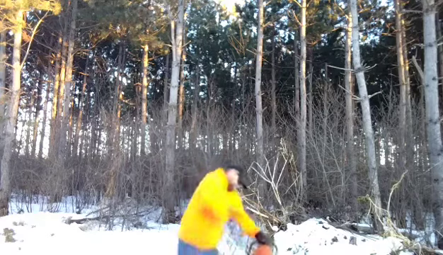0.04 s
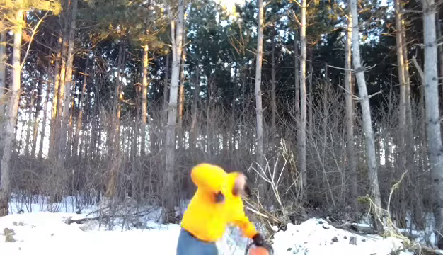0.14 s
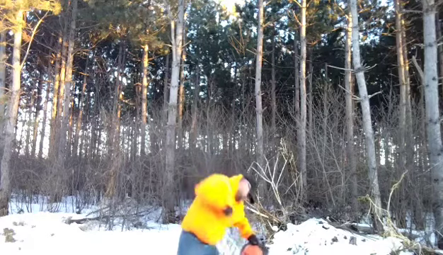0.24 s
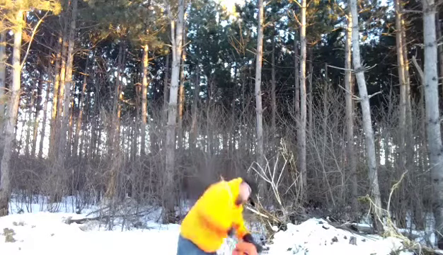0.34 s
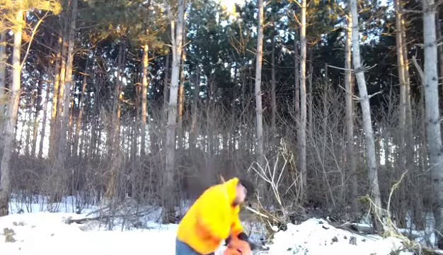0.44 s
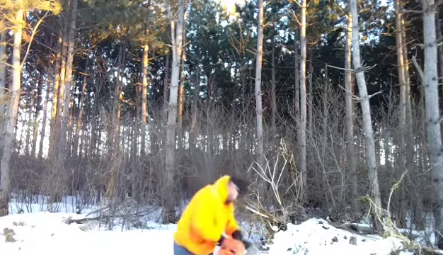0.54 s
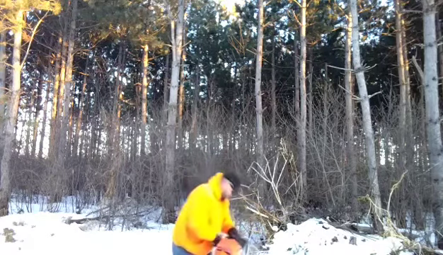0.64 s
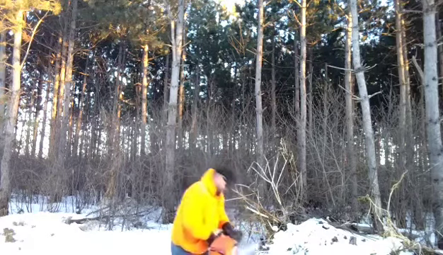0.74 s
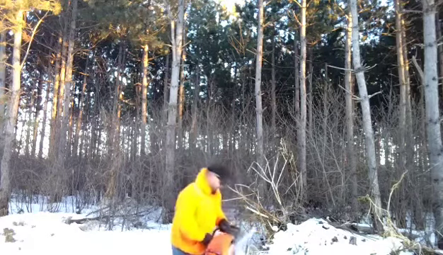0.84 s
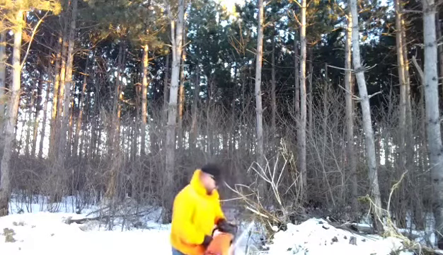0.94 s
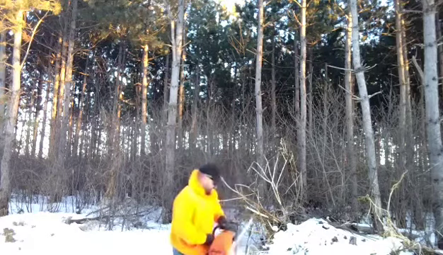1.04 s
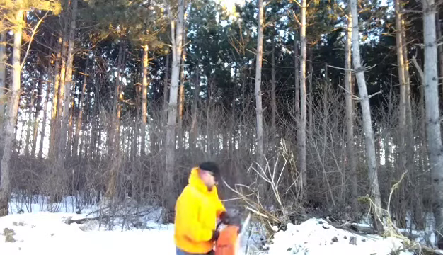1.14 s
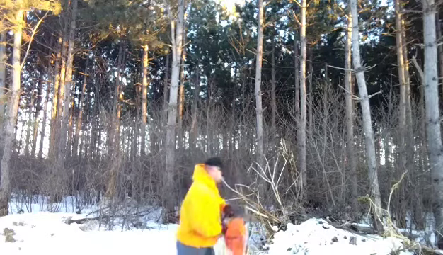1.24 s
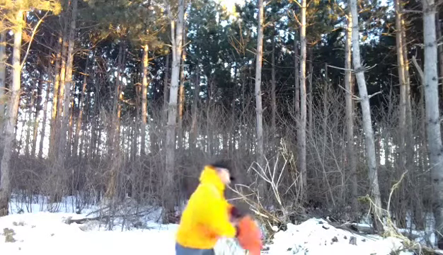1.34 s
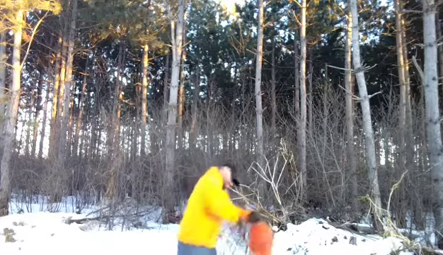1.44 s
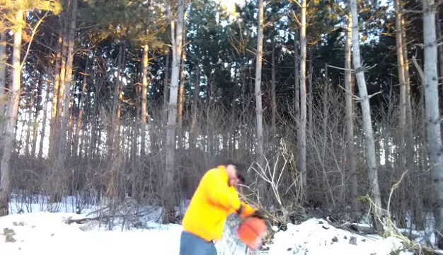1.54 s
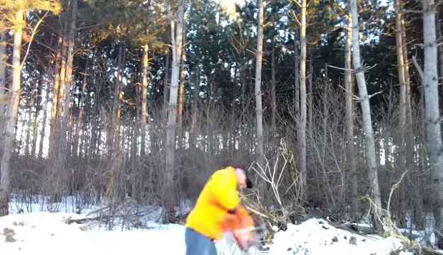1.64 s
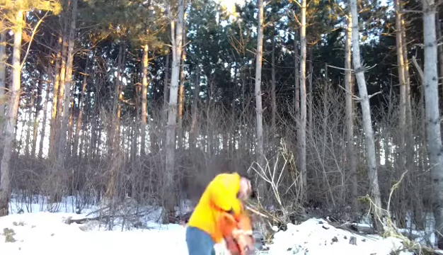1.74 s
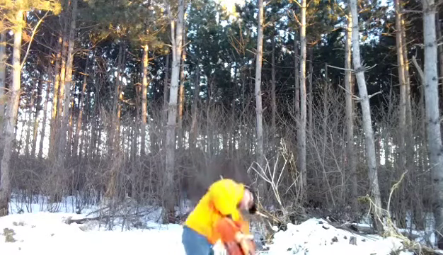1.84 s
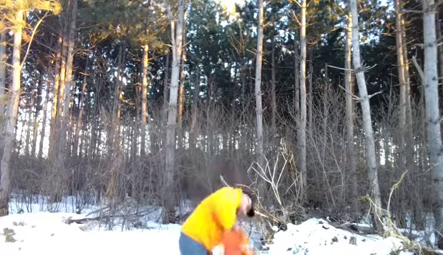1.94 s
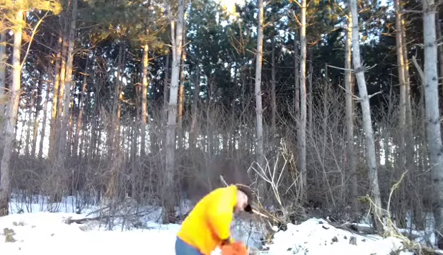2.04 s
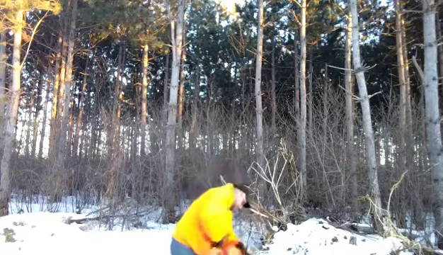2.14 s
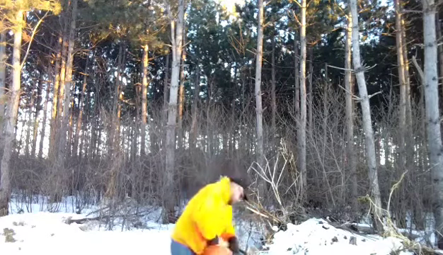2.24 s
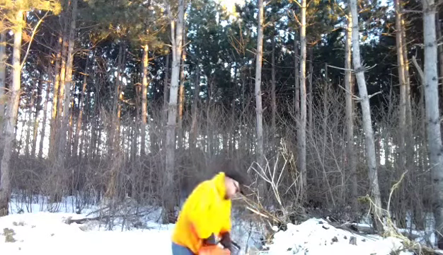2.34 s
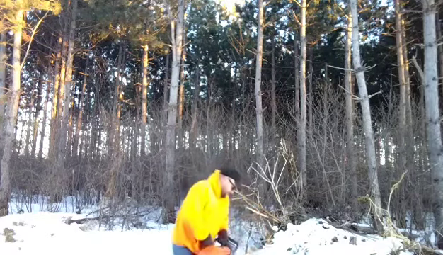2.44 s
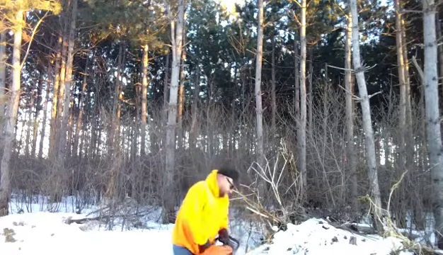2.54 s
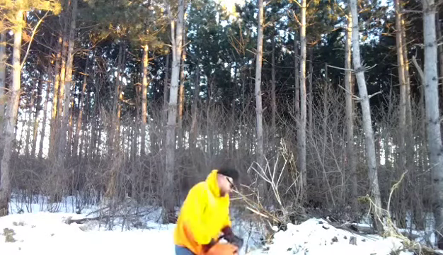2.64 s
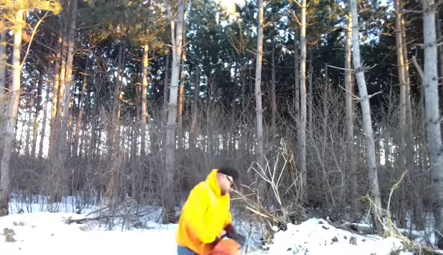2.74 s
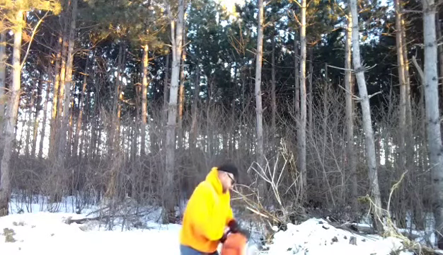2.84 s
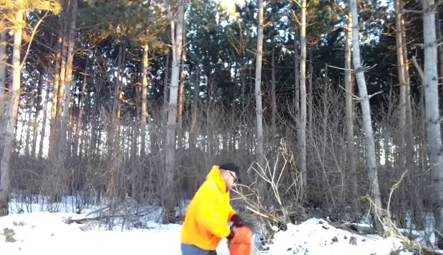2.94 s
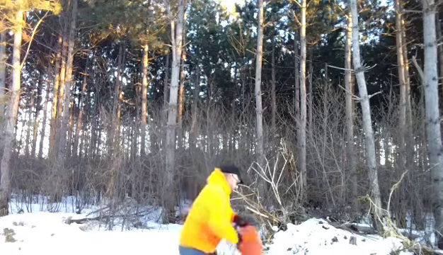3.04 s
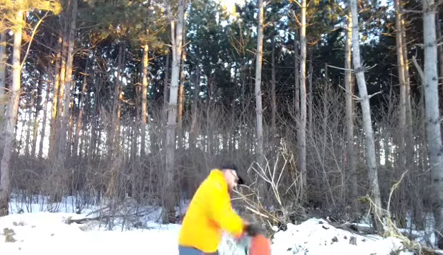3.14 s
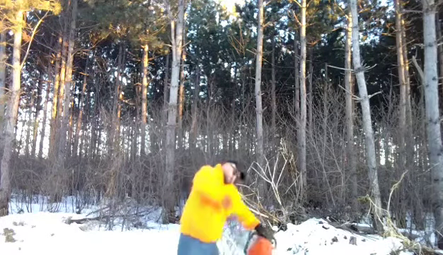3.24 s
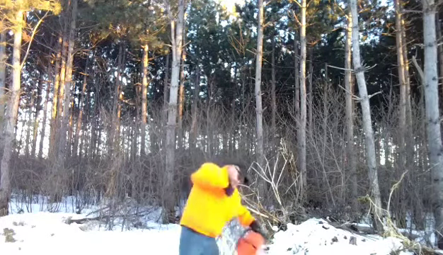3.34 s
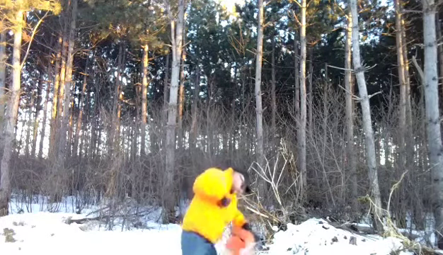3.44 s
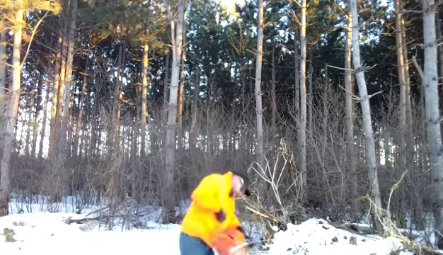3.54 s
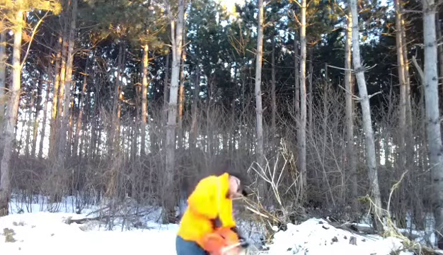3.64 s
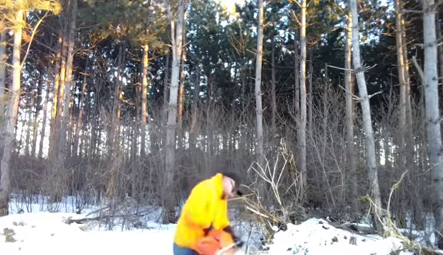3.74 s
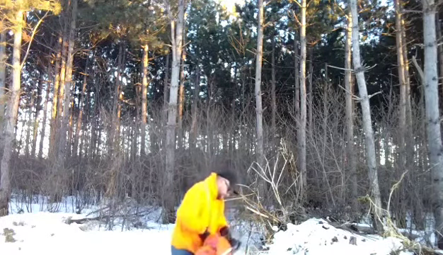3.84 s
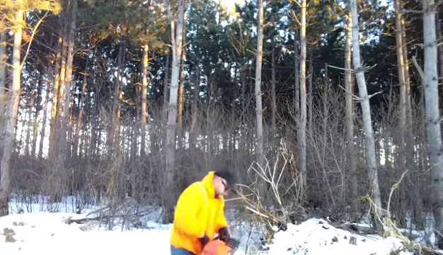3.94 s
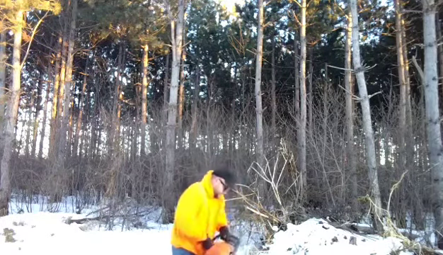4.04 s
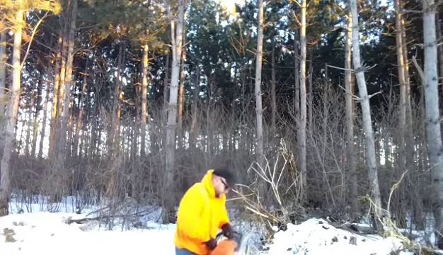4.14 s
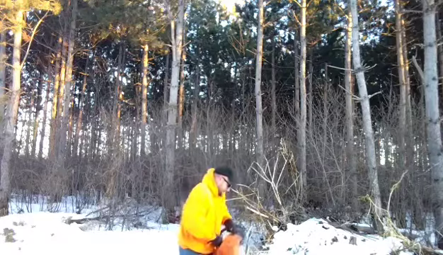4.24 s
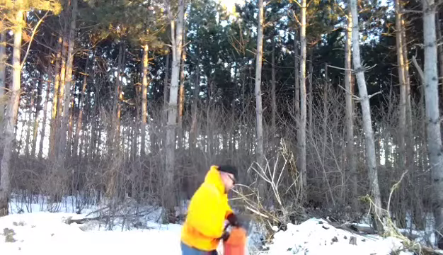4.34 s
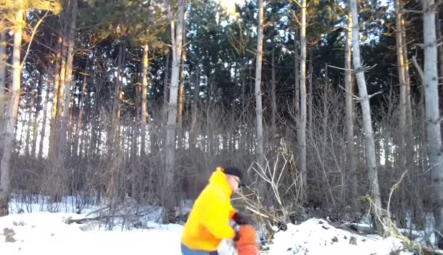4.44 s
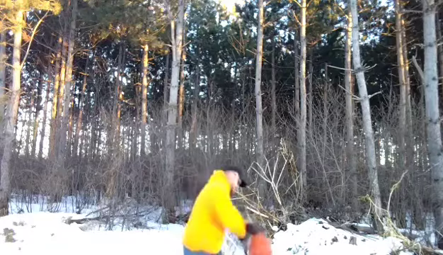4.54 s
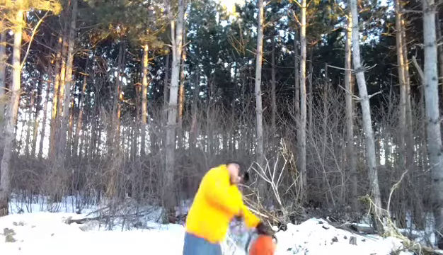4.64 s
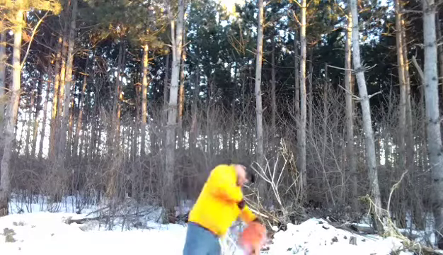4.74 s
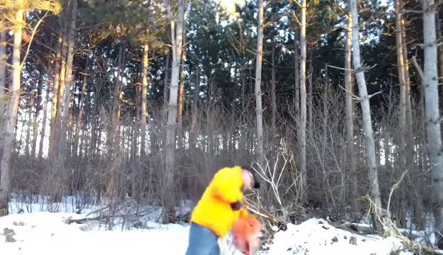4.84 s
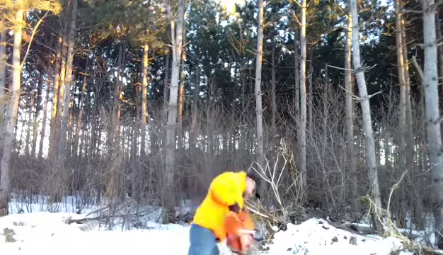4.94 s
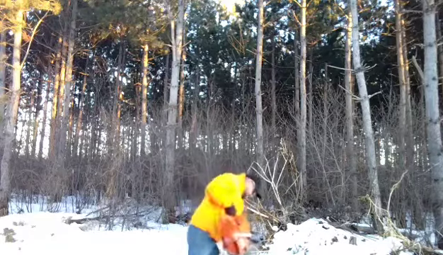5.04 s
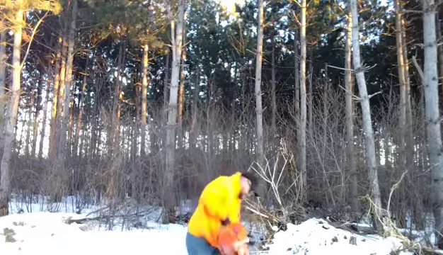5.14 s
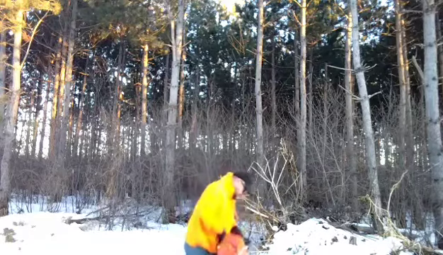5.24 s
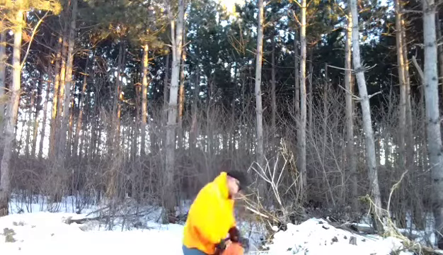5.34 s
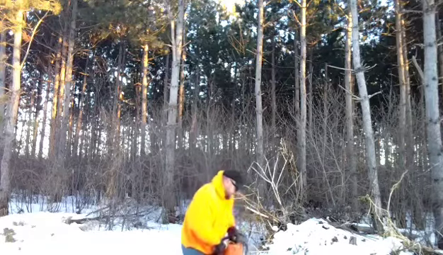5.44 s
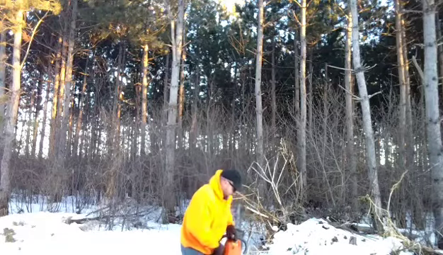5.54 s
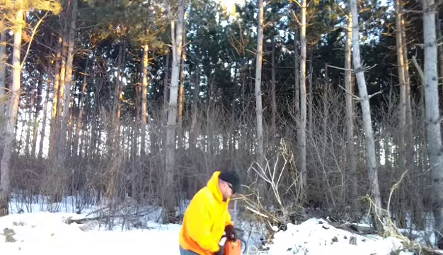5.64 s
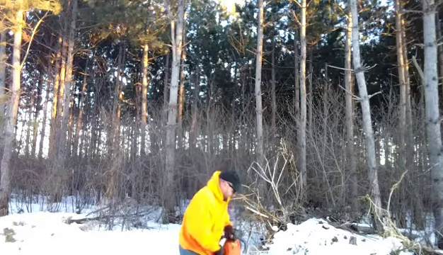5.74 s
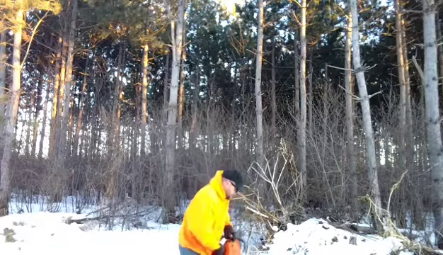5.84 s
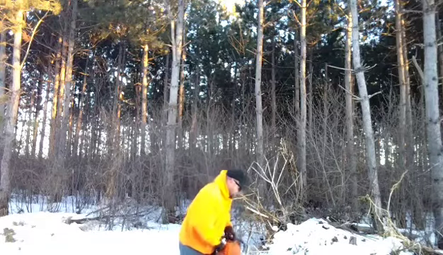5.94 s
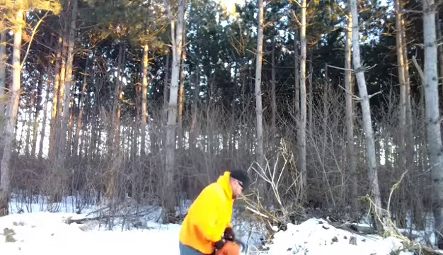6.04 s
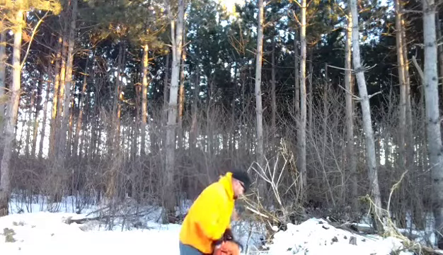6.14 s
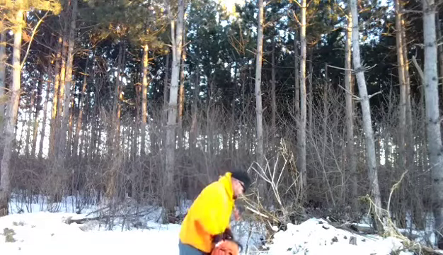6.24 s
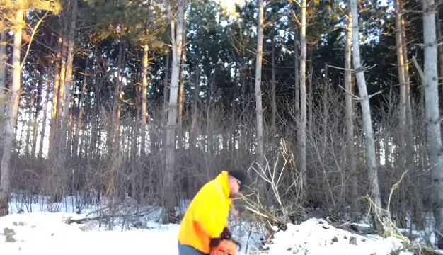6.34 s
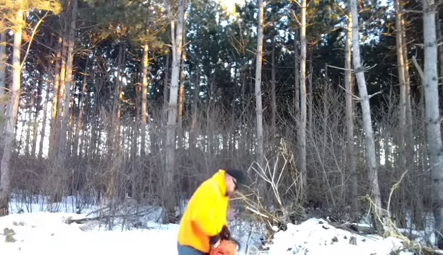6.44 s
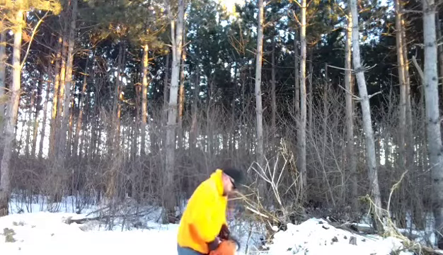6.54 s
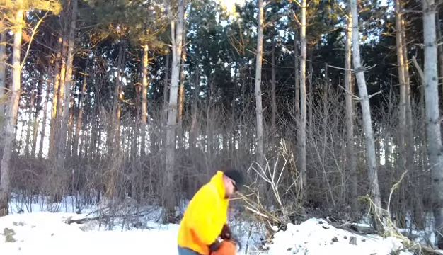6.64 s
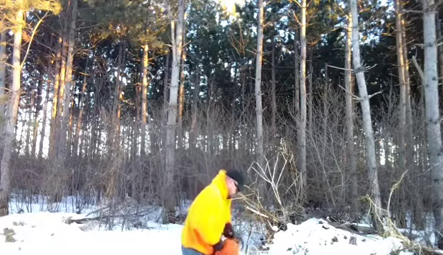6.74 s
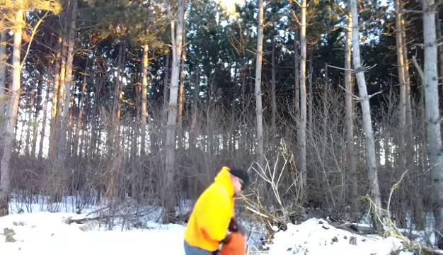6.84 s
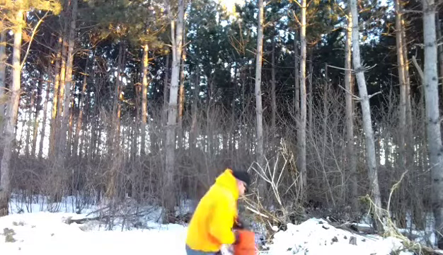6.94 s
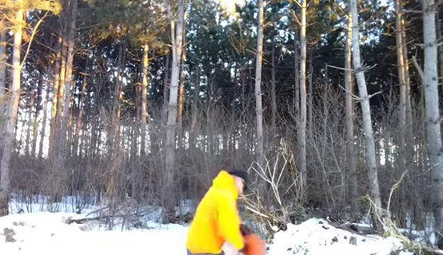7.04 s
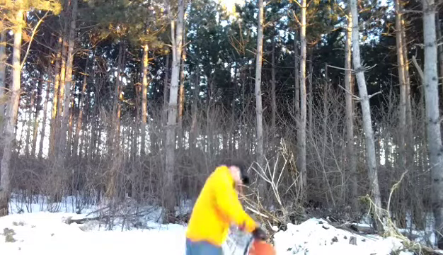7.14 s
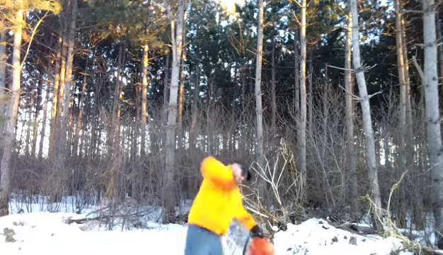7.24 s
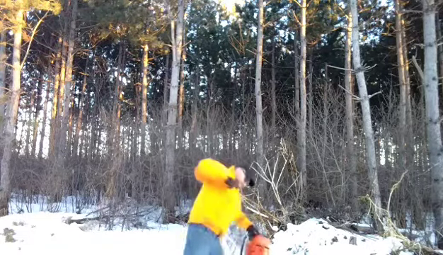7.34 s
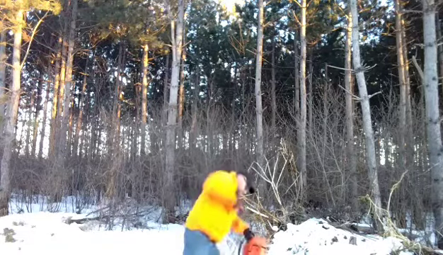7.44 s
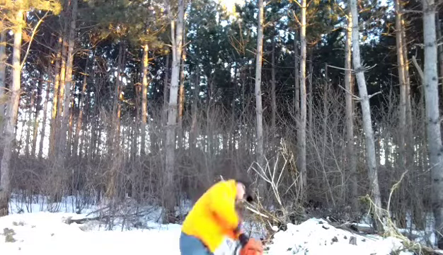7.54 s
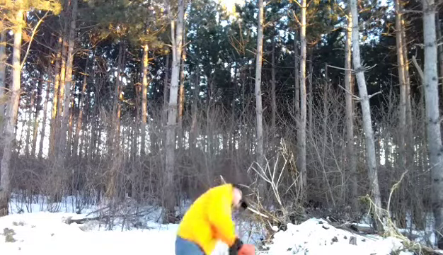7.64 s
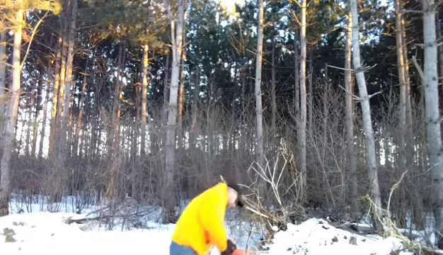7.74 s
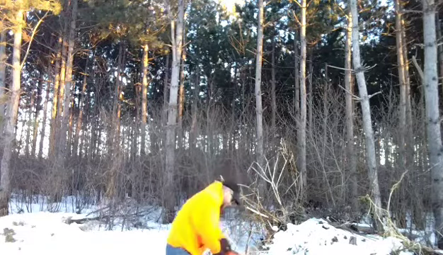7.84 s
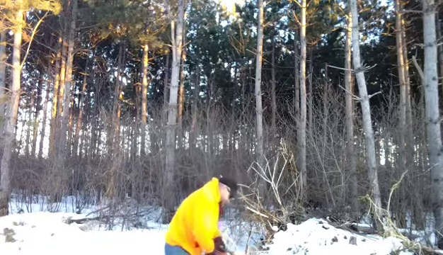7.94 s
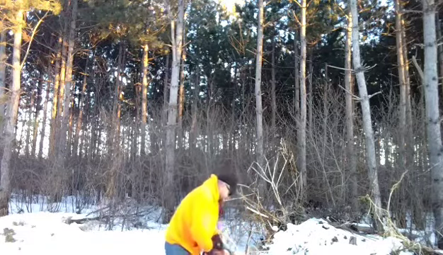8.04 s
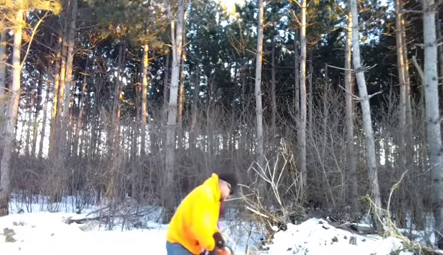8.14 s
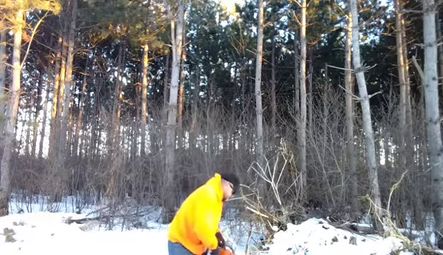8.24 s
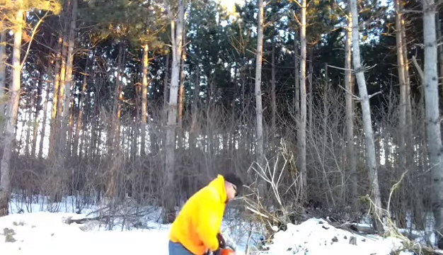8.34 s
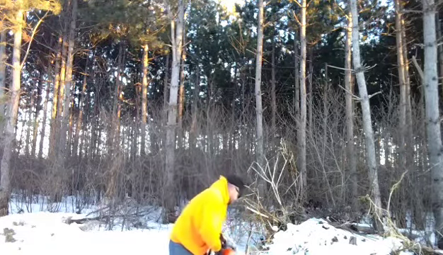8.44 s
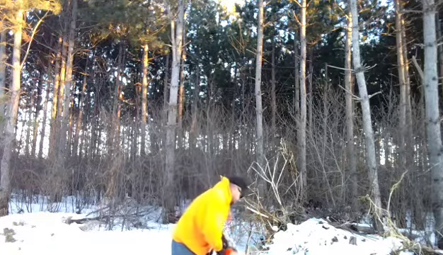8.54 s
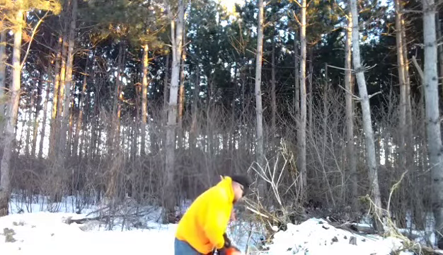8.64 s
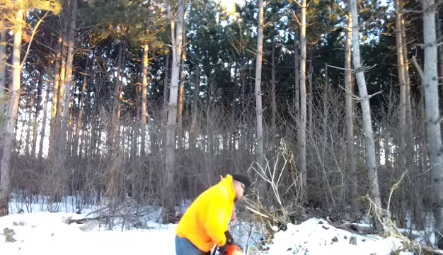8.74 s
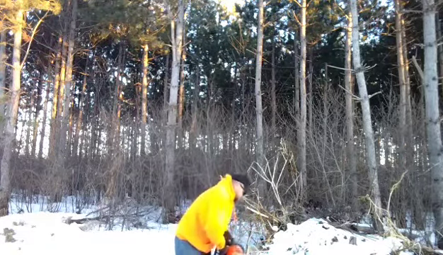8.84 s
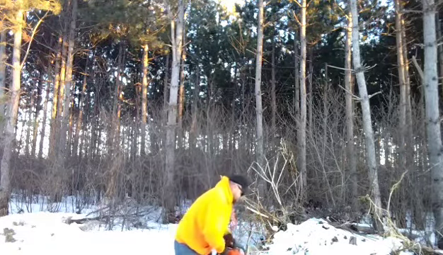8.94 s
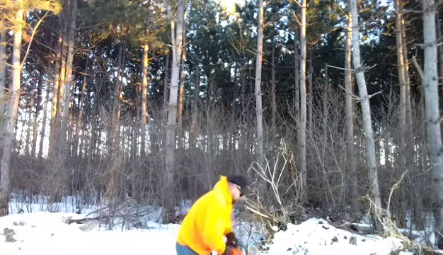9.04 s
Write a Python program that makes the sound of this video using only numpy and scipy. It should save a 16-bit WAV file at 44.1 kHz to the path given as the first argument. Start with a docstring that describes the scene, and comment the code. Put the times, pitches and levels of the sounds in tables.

```python
"""A chainsaw's starter rope is pulled again and again in a snowy wood; the engine does not catch.
Slip noise shaped by plastic case, cover and flywheel makes the rope's rasp; pawls tick past the coasting
flywheel; clacks are noise bursts and ringing modes; damped swings make the piston's puffs, booms and gulps.
Gloves, jacket and snow rustle as coloured noise; the case adds soft knocks and low thumps, a glove squeaks.
Two microphone ports hear the saw directly, then snowbank and trees answer over the quiet air of the wood."""
import sys
import numpy as np
from scipy import signal
from scipy.fft import rfft, irfft, next_fast_len
from scipy.io import wavfile
from scipy.ndimage import uniform_filter1d, map_coordinates

SR = 44100
rng = np.random.default_rng(int(sys.argv[2]) if len(sys.argv) > 2 else 0)


def transcribe(u):
    """Save the signal u as a 16-bit wav file named by the first command-line argument.

    u: samples, shape (n,) or (channels, n), limited to [-1, 1]; the rate is SR.
    q: integer samples, one column per channel.
    """
    v = np.clip(np.atleast_2d(u).T, -1, 1)
    q = np.round(v * 32767).astype(np.int16)
    wavfile.write(sys.argv[1], SR, q)


N = 400428  # samples in the scene

# resonances of the hollow plastic case: hz, width_hz, level_db
CASE = [(540, 190, 0.5), (889, 69, 3.5), (1302, 200, 2.5), (2100, 230, -15.5), (2440, 840, -33.5)]
# ringing modes of the steel flywheel: hz, level_db, t60_s
STEEL = [(3400, -5, .14), (3425, 0, .22), (3495, -4, .14), (3536, -4.5, .85), (3575, 0, .22),
         (3983, -22, .065)]
# ringing modes of the pawls: hz, level_db, t60_s
PAWL = [(3500, -10, 0.041), (4010, -3, 0.033), (4840, -9.5, 0.15), (5562, -13.5, 0.053),
        (6512, -15.5, 0.13), (8330, -2.5, 0.024), (8800, -8.5, 0.11), (9470, -7.5, 0.032),
        (11000, -15.5, 0.13), (11640, -10.5, 0.017)]
# ringing modes of the starter cover: hz, level_db, t60_s
SHELL = [(1385, -7.5, 0.011), (2015, -10, 0.042), (1987, 2.5, 0.025), (2310, 2, 0.0076), (2536, 1, 0.016),
         (2830, -2.5, 0.079)]
# dull spectrum of cloth, also used for the case's low hum: hz, level_db per Hz
CLOTH = [(24, -59), (40, -33), (80, -13), (123, -10), (183, -3.5), (358, -2.5), (431, -4), (942, -11),
         (1200, -21.5), (1560, -49.5), (2640, -120)]


def amp(db):
    """Decibels to gain."""
    return 10 ** (np.asarray(db) / 20)


def unit(x):
    """x at rms 1."""
    return x / np.sqrt(np.mean(x ** 2) + 1e-20)


def along(points, hz):
    """Value at hz, read from (Hz, value) points on a log frequency axis."""
    f, v = np.transpose(points)
    return np.interp(np.log(hz + 1), np.log(f + 1), v)


def wobble(rate):
    """A smooth random curve, rate knots a second."""
    knots = rng.standard_normal(int(N * rate / SR) + 4)
    return map_coordinates(knots, [np.arange(N) * rate / SR])


def filtered(x, response):
    """x times a complex response of frequency, padded so that tails do not wrap round."""
    m = next_fast_len(N + SR // 2)
    return irfft(rfft(x, m) * response(np.fft.rfftfreq(m, 1 / SR)), m)[..., :N]


def colour(spectrum):
    """Gain of a (Hz, dB) spectrum."""
    return lambda hz: amp(along(spectrum, hz))


def resonant(peaks):
    """Causal response of (Hz, width, dB) resonances, added with alternating sign."""
    def response(f):
        total = 0
        for k, (centre, width, db) in enumerate(peaks):
            damping = 1j * f * width
            total = total + (-1) ** k * amp(db) * damping / (centre * centre - f * f + damping)
        return total
    return response


def ringing(modes):
    """Causal response of (Hz, dB, t60) modes: the longer a mode rings, the narrower its resonance."""
    return resonant([(hz, np.log(1000) / np.pi / t60, db) for hz, db, t60 in modes])


def gain_to_unit(response):
    """The response scaled so that white noise keeps its rms."""
    return lambda hz: response(hz) / np.sqrt(np.mean(np.abs(response(hz)) ** 2))


def gritty(rate, spread_db, grit, life, ticks=0):
    """Noise of rms 1 that jumps at every slip (rate a second) or tick and dies back over life seconds."""
    slips = (rng.random(N) < rate / SR) * amp(spread_db * rng.standard_normal(N)) + ticks
    swell = signal.lfilter([1], [1, -np.exp(-1 / (SR * life))], slips)
    share = np.clip(grit, 0, 1)
    return unit((share * unit(swell) + 1 - share) * rng.standard_normal(N))


def bursts(times, dbs, t60s, rise):
    """A dying puff of noise at each time; t60 is held between 4 and 200 ms."""
    out, t = np.zeros(N + SR), np.arange(SR // 8) / SR
    noise = rng.standard_normal((len(times), len(t)))
    for s, db, t60, n in zip(times, dbs, t60s, noise):
        decay = amp(db - 60 * t / np.clip(t60, .004, .2))
        out[round(s * SR):][:len(t)] += decay * (1 - np.exp(-t / rise)) * n
    return out[:N]


def pushes(rows, cycles, rise, glide):
    """Damped swings that swell softly, lose 60 dB in so many cycles and sink to their pitch."""
    out, t = np.zeros(N + SR), np.arange(SR // 6) / SR
    for s, db, hz in rows:
        turns = hz * t + glide * (1 - np.exp(-hz * t))
        swing = np.sin(2 * np.pi * turns) * amp(-60 * t * hz / cycles) * (1 - np.exp(-t / rise)) ** 2
        out[round(s * SR):][:len(t)] += amp(db) * swing / np.abs(swing).max()
    return out[:N]


def swells(rows, rise_db, stop):
    """Level and shares from (peak, rise, hold, dB, sag, shares): climb, sag, then 20 dB lost per stop."""
    t = np.arange(0, N + 32, 32) / SR  # every 32nd sample, interpolated below
    s, rise, hold, db, sag_db, *shares = np.transpose(rows)[:, :, None]
    rise, hold = np.abs(rise) + .001, np.abs(hold) + .001
    climb_db = rise_db * np.clip(s - t, 0, None) / rise
    sagged_db = sag_db * np.clip((t - s) / hold, 0, 1)
    stopped_db = 20 * np.clip(t - s - hold, 0, None) / stop
    gain = amp(db - climb_db - sagged_db - stopped_db)
    level = gain.sum(axis=0) + 1e-12
    curves = [level] + [(gain * amp(share_db)).sum(axis=0) / level for share_db in shares]
    return [np.interp(np.arange(N) / SR, t, curve) for curve in curves]


def patchy(x, patchy_db):
    """x at rms 1 with random patches of gain: the rattle's resonances come and go."""
    z = signal.stft(x, nperseg=512)[2]
    field = uniform_filter1d(rng.standard_normal(z.shape), size=2, axis=0)  # across frequency
    field = uniform_filter1d(field, size=8, axis=1)  # across time
    return unit(signal.istft(z * amp(patchy_db * unit(field)), nperseg=512)[1][:N])


def friction():
    """Rope slips and pawl ticks shake case and cover; flywheel and pawls are kept ringing."""
    # rope and flywheel strokes: peak_s, rise_s, hold_s, rasp_db, sag_db over the hold (negative swells),
    # then shares: steel_ring_db, sizzle_db, case_hum_db
    strokes = [(0.062, 0.012, 0.15, -41.5, -3.5, -0.5, -19, 1.5),
               (0.236, 0.0049, 0.073, -38.5, 23, 7, 4, -17), (0.3, 0.34, 0.25, -42, -1, 2, -2.5, 6.5),
               (0.56, 0.026, 0.071, -52.5, 4, -39, -18.5, 11.5),
               (1.518, 0.0026, 0.19, -35, 29, 6.5, -13.5, -4), (1.525, 0.0089, 0.094, -55.5, 4, 16, 1, -10),
               (1.748, 0.0034, 0.15, -56.5, 4, -14, -16, -1),
               (2.017, 0.036, 0.017, -64, 19.5, -26, -26, 30),
               (2.137, 0.16, 0.14, -47.5, 17, -2, -13.5, 8.5), (2.2, 0.044, 0.095, -67, 2, -6, -16, 3),
               (2.66, 0.017, 0.073, -52.5, 22, -5.5, -14, 11.5),
               (3.238, 0.0037, 0.14, -38, -4, -1, -9.5, -1.5),
               (3.385, 0.0049, 0.056, -48.5, 1.5, -9, -14.5, -19), (3.5, 0.083, 0.028, -51, 2, -3, -6, 9.5),
               (3.545, 0.0078, .17, -46.5, 3.5, -5, -2.5, 13.5),
               (3.775, 0.05, 0.043, -46, 11.5, -18, -22, 10.5),
               (3.838, 0.0032, 0.043, -46, 5.5, -27, -24, 5.5),
               (4.668, 0.0064, 0.27, -33, 34, -5.5, -19.5, -0.5),
               (4.993, 0.045, 0.13, -47.5, 19, -18, -11, 8.5),
               (5.06, 0.053, 0.042, -55.5, 14, -20, -27, 13),
               (5.15, 0.018, 0.103, -59, 27, -0.5, -4.5, 14.5),
               (5.304, 0.047, 0.12, -43.5, 39, -27, -17.5, 9), (6.312, 0.0047, 0.18, -50.5, 30, -6, -20, 3),
               (6.325, 0.0087, 0.076, -64, 11, -18, -20, 18),
               (6.452, .004, 0.063, -60.5, 18, -8, -24, 12.5), (6.56, 0.0048, 0.062, -52, 6, -6, -19, 3),
               (6.645, 0.0034, 0.18, -57.5, 18.5, -30.5, -35, 8),
               (7.186, 0.0033, 0.13, -32.5, 1, -6, -20.5, -6), (7.36, .004, 0.15, -37, 12, 7, -3, -15),
               (7.51, 0.011, 0.23, -40.5, 1, 7, -1.5, 8), (7.77, 0.0038, 0.19, -45, 25.5, -29, -21, 4.5)]
    # rope rasp: hz, level_db per Hz
    rasp_spectrum = [(120, -49.5), (200, -8.5), (513, -9), (720, -14), (880, 3), (1110, -22.5), (2720, -16),
                     (3070, -31), (3480, -20), (4590, -27.5), (8000, -25), (10400, -69), (17600, -120)]
    # fine sizzle: hz, level_db per Hz
    sizzle_spectrum = [(2350, -16.5), (4000, -4.5), (4580, -25.5), (4990, -19.5), (6080, -25),
                       (7700, -23.5), (8380, -0.5), (11200, -13.5), (13200, -10.5), (14300, -21)]
    # pawl spring at each pass: hz, level_db, t60_s
    catch_modes = [(3970, 0, 0.027), (4030, -5.5, 0.034)]
    level, steel, fizz, hum = swells(strokes, rise_db=24, stop=0.015)
    ticks = ratchet()

    slips = gritty(330, spread_db=3.5, grit=.75, life=.0018, ticks=1.8 * ticks)
    rasp = 0.52 * unit(filtered(slips, colour(rasp_spectrum)))
    rasp += 0.53 * unit(filtered(slips, resonant(CASE)))
    rasp += 0.46 * unit(filtered(slips, ringing(SHELL)))
    rasp = 0.9 * patchy(rasp, patchy_db=3.2)

    low_slips = gritty(60, spread_db=1, grit=0.58, life=0.0033)
    low = unit(filtered(low_slips, lambda hz: colour(CLOTH)(hz) * resonant(CASE)(hz)))

    steel_slips = gritty(180, spread_db=1.5, grit=0.35, life=0.0012, ticks=3 * ticks)
    ring = filtered(level * steel * steel_slips, gain_to_unit(ringing(STEEL)))

    fine = gritty(130, spread_db=5.5, grit=0.62, life=0.004, ticks=2.2 * ticks)
    sizzle = 1.1 * unit(filtered(fine, colour(sizzle_spectrum)))
    sizzle += .5 * unit(filtered(fine, ringing(PAWL)))
    sizzle = 2.9 * patchy(sizzle, patchy_db=4.5)

    catch = amp(-8.5) * filtered(level * ticks * 30, gain_to_unit(ringing(catch_modes)))
    rubbing = level * (rasp + amp(-5.5) * hum * low + amp(-5.5) * fizz * sizzle)
    return catch + rubbing + amp(-6.0) * ring


def ratchet():
    """One slightly uneven tick per pawl pass while the flywheel coasts and slows."""
    # coasting spells: start_s, end_s, first_rate in ticks/s, last_rate in ticks/s
    coast = [(0.245, 0.602, 56, 38), (7.482, 7.637, 62, 49)]
    ticks = np.zeros(N)
    for start, end, first, last in coast:
        i = np.arange(round(start * SR), round(end * SR))
        passes = np.cumsum(np.linspace(first, last, len(i))) / SR
        at = i[1:][np.diff(np.floor(passes)) > 0]
        late = rng.integers(SR // 500, size=len(at))  # up to 2 ms
        ticks[at + late] = amp(rng.normal(0, 5.3, len(at)))
    return ticks


def clacks():
    """Each contact is a short rattle: a crack, the cover, the hollow case, the ring of flywheel and pawls."""
    # clacks and toned ticks of the starter: start_s, level_db, hollow_db, bright_db,
    # crack_t60_s, favoured case tone_hz, flywheel ring_db, cover_db (parts relative to level_db)
    clack_rows = [(0.0478, -29, -6, -28, 0.024, 506, -30.5, -2.5),
                  (0.0627, -11, -10.5, -41, 0.044, 530, -21.5, 1.5),
                  (0.221, -5, -4.5, 2, 0.025, 523, -19.5, 0.5),
                  (0.2253, -4.5, -10, -22, 0.018, 620, -16.5, -2.5),
                  (0.369, -28.5, 7.5, -29, 0.0083, 880, -26, 2.5),
                  (0.449, -35.5, 7.5, -30, 0.017, 496, -34, 2.5),
                  (0.616, -42.5, 5.5, -25, 0.015, 540, -36, 1),
                  (1.4925, -31, -41.5, -30.5, 0.021, 870, -23.5, 2),
                  (1.503, -9.5, -16.5, -7, 0.042, 870, -19, 1.5),
                  (1.732, -17.5, -11, -49, 0.013, 1050, -44, 3.5),
                  (1.835, -34.5, -15.5, -16, 0.037, 600, -27, -18),
                  (2.138, -22, -6, -21.5, 0.049, 850, -31, -10),
                  (2.6513, -35, -16, 6.5, 0.017, 510, -28, 2), (2.6879, -39.5, 4, -22, 0.037, 870, -29, 5),
                  (3.2234, -9, -13.5, -12, 0.032, 517, -20.5, -6),
                  (3.2282, -11, -26, -17, 0.011, 515, -22.5, 10),
                  (3.305, -26, -1.5, -30.5, 0.0093, 870, -30, 0),
                  (3.3606, -19.5, -1.5, -11, 0.011, 536, -24, 8),
                  (3.8209, -25.5, 2, -19.5, 0.038, 912, -30, 2.5),
                  (4.6516, -11.5, -11.5, -24.5, 0.05, 867, -17.5, 0),
                  (5.039, -34, -1.5, -37, 0.027, 695, -25, -14),
                  (5.3063, -30, 3.5, -40, 0.028, 840, -38, 1), (5.6217, -46, 7, -44, 0.019, 890, -40, 9),
                  (6.2995, -19, -6, -5.5, 0.028, 870, -19, 3),
                  (6.4433, -32.5, 1.5, -26, 0.019, 735, -37.5, -1),
                  (6.5519, -29.5, -6.5, 1, 0.018, 523, -22.5, 3),
                  (6.6343, -33, 6, -35.5, 0.021, 728, -32.5, 6),
                  (7.1619, -25.5, -22.5, -16.5, 0.0064, 628, -26.5, 0),
                  (7.1718, -8, -12.5, -16, 0.039, 600, -22.5, 1.5),
                  (7.3345, -3.5, -17, 1.5, 0.026, 880, -20, -1),
                  (7.3409, 4, -16, -11.5, 0.036, 795, -32, -8),
                  (7.531, -33, 4, -24.5, 0.022, 560, -29.5, 11),
                  (7.706, -29.5, 5, -28.5, 0.013, 650, -26, 1), (7.7594, -27, 2, -18, 0.026, 608, -42, 6.5),
                  (8.2495, -54, 3.5, -36.5, 0.05, 1300, -34.5, 2.5)]
    # single loud pawl ticks: start_s, level_db, bright_db relative to it
    tick_rows = [(0.3022, -18, -16), (0.3628, -28, 8), (0.484, -15.5, -15), (3.5328, -29, 6.5),
                 (3.5591, -32, -11.5), (3.5803, -23.5, 1), (3.615, -25.5, 7), (3.6555, -22, -18),
                 (3.6899, -35.5, 3), (3.7718, -35.5, 9.5), (4.9394, -34, -5), (4.9852, -29, -1),
                 (4.865, -49, 11), (5.1427, -38.5, 6.5), (5.504, -52.5, 10), (5.591, -54, 13),
                 (5.255, -51.5, 16.5), (5.2895, -29.5, 7), (6.411, -48, 5), (6.535, -46.5, 15),
                 (6.613, -40.5, 0), (7.4935, -25, 8), (7.5936, -21.5, 0), (7.6128, -22, -7),
                 (7.637, -23, 10.5), (7.664, -19, 11), (7.6937, -33, 16), (7.7305, -35, 22)]
    # dry crack of a contact: hz, level_db per Hz
    crack_spectrum = [(120, -51.5), (200, -26.5), (561, 0), (1140, -11.5), (2680, 1.5), (3040, -14),
                      (3440, -2.5), (4250, -20.5), (5500, -15), (6520, -14.5), (9470, -17), (11700, -17.5),
                      (13200, -25.5), (14300, -30.5)]
    toned = [(s, db, low, ring, high, t60, tone, shell)
             for s, db, low, high, t60, tone, ring, shell in clack_rows]
    # every pawl tick: hollow -7.5 dB, ring -18 dB, t60 14 ms, case tone 505 Hz, cover 0 dB
    ticks = [(s, db, -7.5, -18, high, 0.014, 505, 0) for s, db, high in tick_rows]
    s, db, hollow_db, ring_db, bright_db, t60, tone_hz, cover_db = np.transpose(toned + ticks)

    crack = bursts(s, db - 13.0, t60, rise=0.0001)
    crack = filtered(crack, gain_to_unit(colour(crack_spectrum)))
    cover = bursts(s, db + cover_db - 5.0, .6 * t60, rise=0.0023)
    cover = filtered(cover, gain_to_unit(ringing(SHELL)))
    hollow = bursts(s, db + hollow_db + 2.0, 1.3 * t60, rise=0.005)
    hollow = filtered(hollow, gain_to_unit(resonant(CASE)))
    impulses = np.bincount(np.int_(s * SR), amp(db + ring_db + 26.5), N)
    ring = filtered(impulses, gain_to_unit(ringing(STEEL)))
    bright = bursts(s, db + bright_db, 0.41 * t60, rise=0.0012)
    bright = filtered(bright, gain_to_unit(ringing(PAWL)))
    return struck(s, db + hollow_db - 2.5, tone_hz) + crack + cover + hollow + ring + bright


def struck(times, dbs, tones_hz):
    """The case rings on all its modes, most near the tone that the contact favours."""
    # modes of the struck case: hz, level_db, t60_s
    body = [(414, -9.5, 0.13), (539, -0.5, .07), (640, -7, 0.013), (683, -5.5, 0.044), (797, -3.5, 0.048),
            (895, -0.5, 0.055), (1362, 0.5, 0.027), (1910, -5.5, .05), (2255, -4.5, .04)]
    fall_db = 11  # lost per octave from the favoured tone
    out, t = np.zeros(N + SR), np.arange(SR // 8) / SR
    hz, level_db, t60 = np.transpose(body)[:, :, None]
    luck = rng.standard_normal((len(times), 2, len(body), 1))
    for s, db, tone, (size, pitch) in zip(times, dbs, tones_hz, luck):
        octaves_off = np.abs(np.log2(hz / tone))
        gain = amp(db + level_db + 3.2 * size - fall_db * octaves_off - 60 * t / t60)
        modes = gain * np.sin(2 * np.pi * hz * (1 + .015 * pitch) * t)
        out[round(s * SR):][:len(t)] += modes.sum(axis=0) * (1 - np.exp(-t / 0.0012))
    return out[:N]


def pings():
    """The pawl spring pings: high damped swings at a steady pitch."""
    # start_s, peak_db, pitch_hz
    ping_rows = [(0.318, -33.5, 4110), (0.339, -34, 4050), (0.364, -33.5, 4000), (0.382, -31.5, 4070),
                 (0.402, -30, 4000), (0.421, -37, 4030), (7.489, -31, 3900), (7.637, -41.5, 4100),
                 (7.692, -35.5, 3500), (7.727, -28, 3720)]
    return pushes(ping_rows, cycles=59, rise=0.0015, glide=0)


def puffs():
    """The piston passes the top of its stroke: a sinking puff, then crankcase boom and intake gulp."""
    # start_s, peak_db of the puff
    passes = [(0.099, -30), (0.155, -27.5), (0.211, -32), (1.556, -49.5), (3.264, -28.5), (3.323, -27.5),
              (4.706, -28), (7.215, -28.5), (7.276, -26.5)]
    puff = pushes([(s, db, 70.3) for s, db in passes], cycles=1.9, rise=0.0074, glide=1.6)
    boom = pushes([(s + .016, db - 11.5, 82) for s, db in passes], cycles=13.0, rise=0.005, glide=.1)
    gulp = pushes([(s + 0.017, db - 6, 337) for s, db in passes], cycles=8.2, rise=0.0015, glide=0.11)
    return puff + boom + gulp


def rustling():
    """Gloves, jacket and packed snow: a lumpy rustle of dull cloth noise and crisp crackle."""
    # movements of gloves, jacket and boots: peak_s, rise_s, fall_s, level_db, crispness_db
    movements = [(0.005, 0.012, 0.15, -50.5, -19.5), (0.802, 0.13, 0.98, -73.5, -1),
                 (1.238, 0.97, 0.016, -62, -5.5), (1.42, 0.084, 0.12, -57, -6),
                 (1.495, 0.065, 0.012, -45.5, -20), (2.6, 1, 0.046, -62.5, -3.5),
                 (2.8, 0.3, 0.031, -64, -9), (2.99, 0.28, 0.72, -82, 14),
                 (3.214, 0.32, 0.029, -53.5, -15.5), (4.3, 0.82, 0.06, -64, -7),
                 (4.466, 0.016, 0.027, -55.5, -13.5), (4.645, 0.21, 0.015, -55.5, -13),
                 (5.428, 0.034, 0.46, -61, -2.5), (5.641, 0.081, 0.1, -48.5, -21),
                 (5.928, 0.12, 0.07, -60.5, -17), (6.107, 0.2, 0.13, -67.5, -24.5),
                 (6.292, 0.021, 0.0088, -60, 6.5), (6.836, 0.19, 0.14, -58, -8.5),
                 (7.122, 0.15, 0.045, -53, -5.5), (7.169, 0.015, 0.0087, -47, -7.5),
                 (8.079, 0.36, 0.15, -70.5, -3), (8.31, 0.34, 0.018, -64.5, -15.5),
                 (8.528, 0.73, 0.034, -55, -7.5), (8.742, 0.18, 0.089, -57.5, -9.5),
                 (8.97, 0.18, 0.058, -57.5, -17), (9.075, 0.09, 0.017, -58.5, -7)]
    swing_db = 22.5  # lost over a rise or a fall
    rows = [(s, rise, fall, db, swing_db, crispness) for s, rise, fall, db, crispness in movements]
    level, crisp = swells(rows, swing_db, stop=0.037)
    rustle = unit(filtered(gritty(150, spread_db=3, grit=.82, life=0.0045), colour(CLOTH)))
    crackle = unit(filtered(gritty(70, spread_db=5, grit=.33, life=.006), colour(CRISP)))
    return level * (rustle + amp(-2.0) * crisp * crackle)


# crisp crackle of the rustle, also used for rattling loose parts: hz, level_db per Hz
CRISP = [(530, -22.5), (900, -10), (1380, -1), (1690, -10), (2650, -9.5), (2970, -15.5), (3650, -14),
         (9260, -20.5), (12300, -24.5), (14000, -54.5)]


def knocking():
    """Soft knocks and low thumps of the case: damped swings, each with a dull tap of noise."""
    # soft knocks and low thumps of the case: start_s, peak_db, pitch_hz
    knocks = [(0.314, -25.5, 522), (1.165, -52.5, 231), (1.238, -48, 224.5), (1.408, -54, 240),
              (1.566, -31, 380), (1.788, -39, 460), (1.799, -38.5, 644), (1.839, -41.5, 268),
              (1.774, -42.5, 295), (1.822, -42.5, 230), (2.005, -37, 568), (2.074, -39, 476),
              (2.111, -38.5, 640), (0.319, -31.5, 220), (0.349, -41, 227.4), (6.315, -38, 473.4),
              (6.458, -44, 404), (6.729, -51, 1310), (6.269, -49.5, 797), (1.914, -44, 695),
              (2.016, -29, 280), (2.801, -45, 390.3), (2.886, -49.5, 484), (4.034, -47, 550),
              (4.46, -53, 214), (4.541, -45.5, 434), (4.599, -44, 370), (5.002, -34, 264),
              (5.259, -31, 242), (5.648, -34, 431), (5.911, -51, 409), (6.04, -51.5, 437),
              (6.113, -47, 209.5), (6.826, -41.5, 326), (7.272, -26, 928), (8.445, -44.5, 420),
              (8.505, -44.5, 468), (8.523, -50.5, 440), (8.697, -52.5, 520), (8.729, -45, 577),
              (8.748, -48, 302), (8.926, -45, 414), (8.981, -48, 212), (2.198, -47, 152), (2.83, -58, 591),
              (2.856, -53, 398), (2.915, -56, 497), (3.557, -41, 202.7), (3.586, -50, 173),
              (3.618, -49, 154.6), (4.107, -47, 608), (5.111, -47, 171.8), (5.084, -42, 260),
              (5.03, -42, 230), (5.21, -50, 477), (5.224, -48, 496), (5.329, -45.5, 219),
              (6.17, -56.5, 817), (7.575, -42, 175.5), (7.667, -37, 244), (7.742, -42.5, 148),
              (7.789, -44, 154), (7.846, -41, 240), (7.88, -46, 170.2), (8.66, -56.5, 799),
              (8.897, -60.5, 905)]
    s, db, _ = np.transpose(knocks)
    soft_contact = lambda hz: resonant(CASE)(hz) / (1 + 1j * hz / 1500)
    taps = bursts(s, db - 9.5, np.full(len(s), .035), rise=0.00017)
    taps = filtered(taps, gain_to_unit(soft_contact))
    loose = bursts(s, db - 23.5, np.full(len(s), .02), rise=.0005)  # loose parts rattle
    taps += filtered(loose, gain_to_unit(colour(CRISP)))
    return pushes(knocks, cycles=6.4, rise=0.00086, glide=0.028) + taps


def squeaks():
    """A glove squeaks along the case: a short rising stick-slip tone with its octave."""
    # start_s, length_s, level_db (rms of the fundamental), from_hz, to_hz
    squeak_rows = [(1.86, 0.025, -45.5, 234, 344)]
    out = np.zeros(N)
    for s, length, db, from_hz, to_hz in squeak_rows:
        u = np.linspace(0, 1, round(length * SR))
        turn = 2 * np.pi * np.cumsum(from_hz + (to_hz - from_hz) * u) / SR
        tone = np.sin(turn) + amp(-10) * np.sin(2 * turn)
        out[round(s * SR):][:len(u)] += 2 * amp(db) * np.sin(np.pi * u) * tone
    return out


def low_cut_share(hz):
    """Long waves meet both ports alike: a share that grows with frequency, one half at 900 Hz."""
    return hz / (hz + 900)


def direct(saw):
    """Direct sound reaches the two microphone ports with their own gain and phase."""
    # phase lead of the left port, before low_cut_share: hz, lead_rad
    lead = [(0, -2.5), (700, 0), (1300, .8), (2000, 1.33), (2840, 0), (3100, 2.5), (3700, 2), (5510, 0.5),
            (6200, 6.5), (6720, 2), (7580, -6), (8960, -1.5), (9730, -9.5), (10400, 1.5), (11500, 2),
            (12700, 9), (14000, 5.5)]
    # left port against right: hz, difference_db
    tilt = [(60, -1.5), (110, 1), (200, 0), (370, 1.5), (670, 4), (1230, 2.5), (2250, 2.5), (4120, -4),
            (7530, -1), (13800, -4)]

    def port(hz, side):
        phase = side * low_cut_share(hz) * along(lead, hz)
        return amp(side * along(tilt, hz)) * np.exp(1j * phase)
    return filtered(saw, lambda hz: np.array([port(hz, .5), port(hz, -.5)]))


def echoes(x, decay, delay):
    """A random answer for each ear; each frequency dies at its own speed."""
    hz, t, z = signal.stft(rng.standard_normal((2, SR // 2)), SR, nperseg=128)
    dying = z * amp(-60 * t / along(decay, hz)[:, None])
    tail = signal.istft(dying, SR, nperseg=128)[1]
    late = np.pad(x, (round(delay * SR), 0))[None]
    return signal.fftconvolve(late, tail / np.linalg.norm(tail[0]), axes=1)[:, :N]


def snowbank_echoes(saw):
    """Near ground and brush answer within 2 ms; the saw moves, so these echoes keep changing."""
    # near ground and brush: hz, t60_s
    snowbank = [(200, 0.048), (10000, 0.00078)]
    # share that they send back: hz, level_db
    scatter = [(300, -19.5), (1500, -14), (6000, 0), (13000, 0)]
    scattered = filtered(saw, colour(scatter))
    sway = 1.78 * wobble(8)  # radians of cross-fade between two answers
    one = np.cos(sway) * echoes(scattered, snowbank, delay=.0015)
    return one + np.sin(sway) * echoes(scattered, snowbank, delay=0.0014)


def tree_echoes(saw):
    """Trunks answer later and ring longer, with less bass."""
    # hz, t60_s
    trees = [(200, 0.79), (2000, 0.67), (10000, 0.35)]
    return amp(-13.5) * echoes(filtered(saw, low_cut_share), trees, delay=.014)


def air():
    """The quiet wood and the microphone's own hiss, most alike at both ports in the bass."""
    # hz, level_db per Hz
    air_spectrum = [(12, -43), (20, -12.5), (212, -5), (434, -5), (541, -2.5), (1050, -19.5), (2450, -18.5),
                    (3050, -27), (3600, -18), (4490, -32.5), (4870, -27), (10200, -27.5), (14200, -45)]
    likeness = [(100, 0.55), (1500, 0.28), (5000, .1)]  # hz, correlation of the ports
    turn = lambda hz: np.arccos(np.clip(along(likeness, hz), -1, 1)) / 2
    split = lambda hz: colour(air_spectrum)(hz) * [np.cos(turn(hz)), np.sin(turn(hz))]
    mid, side = filtered(rng.standard_normal((2, N)), split)
    return amp(-69 + 0.52 * wobble(1.0)) * unit(np.array([mid + side, mid - side]))


def scene():
    """The saw and its handler, heard directly and through snow and trunks, over the air of the wood."""
    saw = friction() + clacks() + pings() + puffs() + rustling() + knocking() + squeaks()
    return direct(saw) + snowbank_echoes(saw) + tree_echoes(saw) + air()


def record(dry):
    """The microphone rolls off the deep bass and rounds loud peaks; nothing stays from 14.3 kHz up."""
    # overall tone, a narrow dip near 3.1 kHz, then a fade at the top: hz, level_db
    overall_tone = [(2880, 0), (3090, -8), (3280, 0), (12900, 0), (13300, -20), (14300, -30)]
    bass_cut = lambda hz: -hz ** 2 / (62 ** 2 - hz ** 2 + 1j * hz * 70)
    x = filtered(dry, bass_cut)
    x = x / (1 + np.abs(x / 1.1) ** 4) ** (1 / 4)  # soft ceiling at 1.1
    return filtered(x, lambda hz: colour(overall_tone)(hz) * (hz < 14300))


dry = scene()
out = record(dry)
transcribe(out)
```